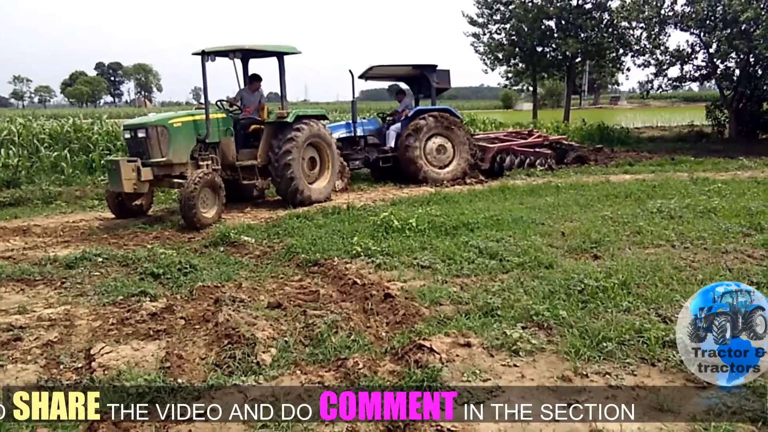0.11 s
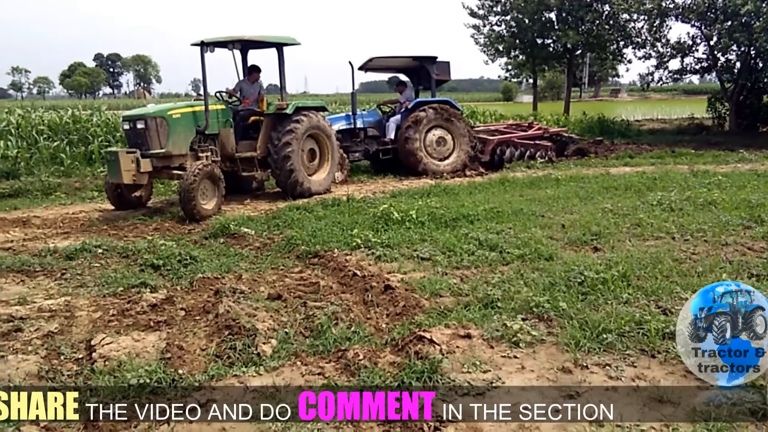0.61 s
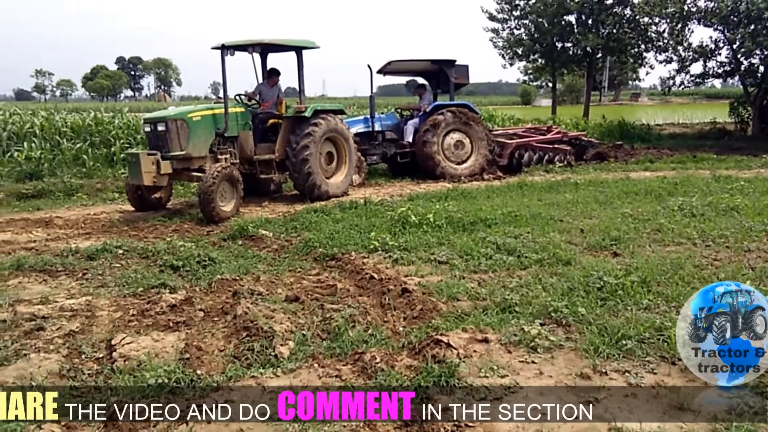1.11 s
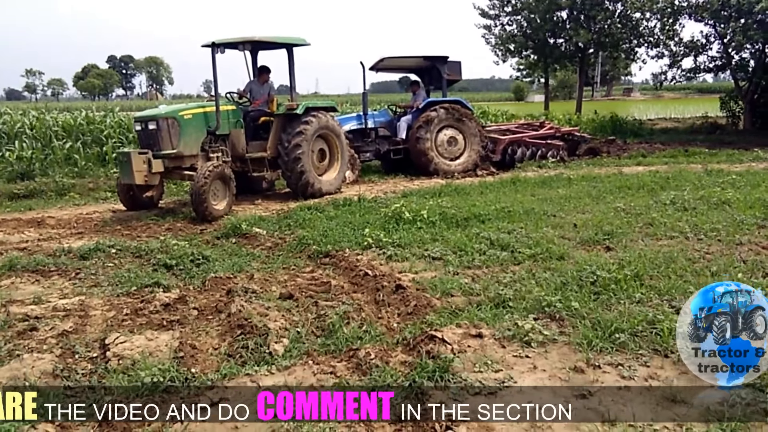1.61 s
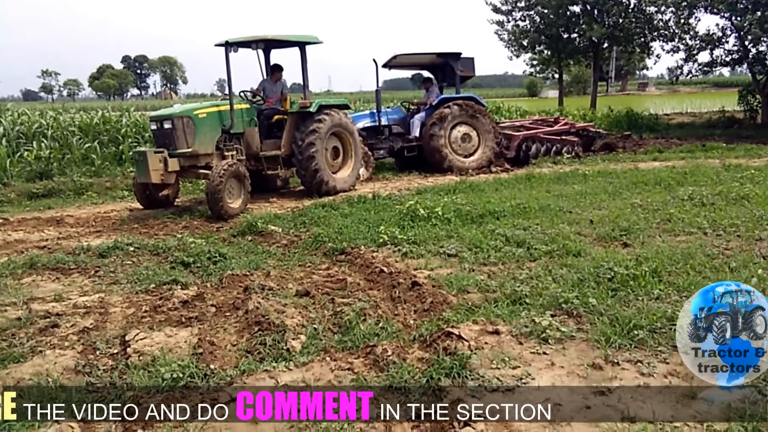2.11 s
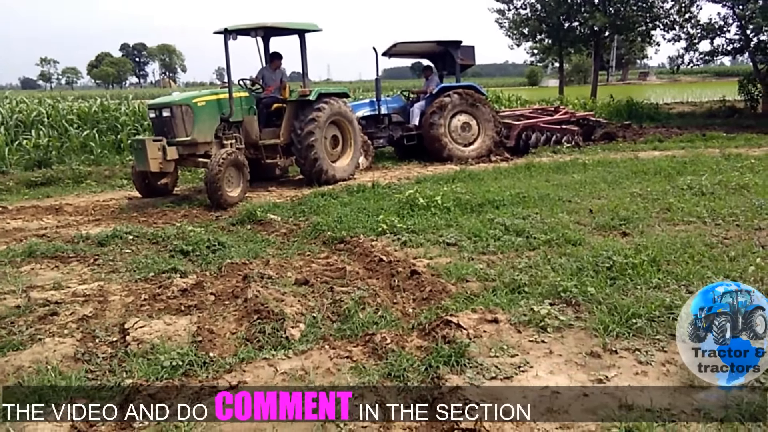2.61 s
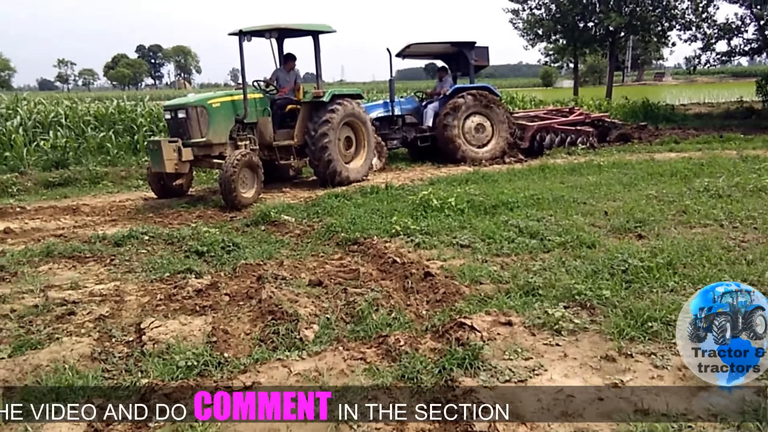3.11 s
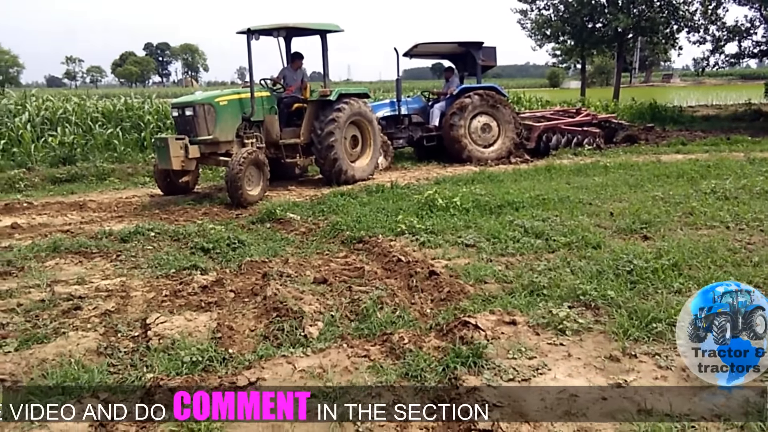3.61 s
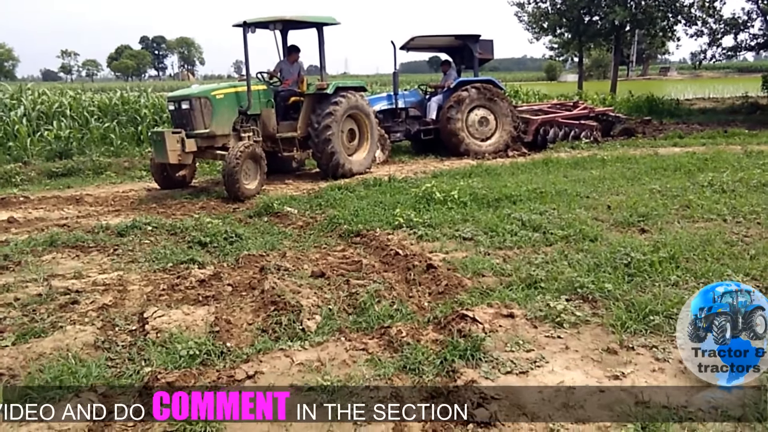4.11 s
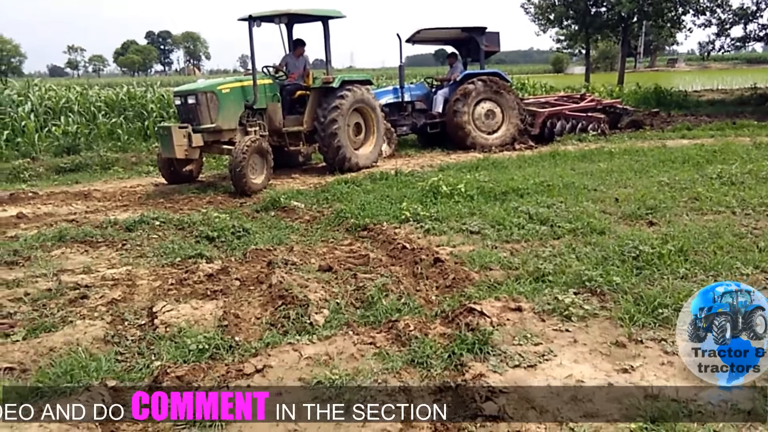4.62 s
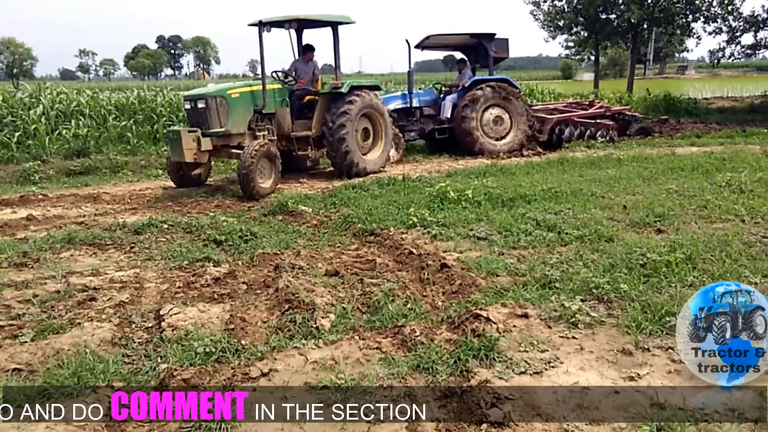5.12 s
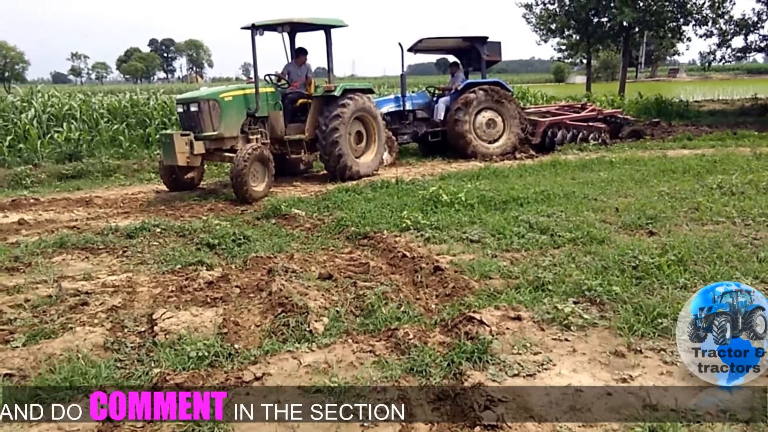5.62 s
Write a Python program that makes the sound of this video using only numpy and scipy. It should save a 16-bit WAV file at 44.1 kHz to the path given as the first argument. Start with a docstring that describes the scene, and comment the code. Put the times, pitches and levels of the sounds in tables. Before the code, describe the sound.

Two diesel tractors knock and clatter at a slow steady pace across an open field while wind buffets and slaps the microphone.

```python
"""Two three-cylinder diesel tractors run at a slow, steady pace across a field, some way off.
From the start the nearer one knocks and clatters much alike in every cycle, by resonances struck in turn;
the farther one ticks slightly faster. An early rattle dies away; steel parts ping as decaying sines.
Wind, shaped noise with slaps, buffets the microphone throughout; late on the near engine works harder.
The engines come once direct and once off the soft ground."""
import sys
import numpy as np
from scipy import signal
from scipy.fft import rfft, irfft, next_fast_len
from scipy.io import wavfile
from scipy.ndimage import uniform_filter1d, map_coordinates

SR = 44100
rng = np.random.default_rng(int(sys.argv[2]) if len(sys.argv) > 2 else 0)


def gain_from_db(level_db):
    """Turn a decibel level (scalar or array-like) into a linear amplitude factor."""
    decades = np.asarray(level_db, float) / 20
    return 10 ** decades


def dump_mix(stems):
    """Bounce the given channels to the path in sys.argv[1] as a 16-bit WAV at rate SR."""
    frames = np.atleast_2d(stems).T  # one column per channel
    limited = np.clip(frames, -1, 1)  # hard clip at full scale
    pcm = np.round(limited * 32767).astype(np.int16)
    wavfile.write(sys.argv[1], SR, pcm)


N = 252693
T = np.arange(N) / SR

# Engine paces; one cycle = two crank turns, three firings: start_s, pace_cycles_per_s
NEAR_PACE = [(0, 11.272), (.5, 11.297), (1.5, 11.243), (2, 11.262), (3, 11.239), (4.5, 11.262), (6, 11.265)]
FAR_PACE = [(0, 11.35), (3, 11.51), (4.5, 11.72), (5.8, 11.76)]
# How hard the near engine works: start_s, level_db
EFFORT = [(0, 0.5), (1.2, 0.5), (3.4, 0.5), (4.3, 1), (4.82, 2.5), (5.3, 1.5), (5.73, 1)]
DIP_S, DIP_LONG_S, DIP_DB = 1.527, 0.057, -4.5  # the engine's level dips briefly

# Blows in one near-engine cycle, relative: place_cycles, casing_db, block_db, pump_db
BLOWS = [(.012, -42, -29, -52), (.09, -36, -36, -43), (.16, -37, -40, -46.5), (.25, -43, -33.5, -52.5),
         (.29, -38, -32, -50), (.333, -42, -33, -34), (.4, -37, -38, -46), (.5, -40, -35, -50),
         (.6, -35, -41, -40), (.635, -44, -30, -50.5), (.682, -41, -37, -46), (.75, -40, -36, -49),
         (.806, -44, -36, -39), (.843, -40, -38, -50), (.885, -44, -34, -51.5), (.935, -36.5, -28, -46)]
BLOWS_DB = -6  # applied to all blows
# Valve ticks in one cycle: place_cycles, level_db
TICKS = [(.0, -54), (.03, -55), (.24, -60), (.28, -60), (.61, -62), (.675, -61)]
# Resonances of the parts: pitch_hz, width_hz, level_db
CASING = [(607, 260, -4.5), (740, 160, -6.5), (900, 160, -8), (1050, 80, -4)]
BLOCK = [(1310, 60, -12), (1425, 55, -4.5), (1500, 58, -1), (1630, 110, -11)]
PUMP = [(2036, 64, 3), (2355, 42, -4), (2650, 83, -1)]
PANELS = [(3926, 14, 7), (4450, 21, 7.6), (5220, 380, 28), (7770, 620, 4), (9600, 82, 15.5)]
VALVES = [(5240, 280, 7.9), (6370, 130, 1.3), (7480, 330, 3.5), (13500, 2500, 11)]
# Blows between these places (cycles) ring the block lower, by this ratio
THIRD_FROM, THIRD_TO, THIRD_LOWER = .62, .7, .955
# Whines that sink or climb in every cycle: place_cycles, length_cycles, from_hz, to_hz, level_db
GLIDES = [(.06, .17, 1080, 680, -43.5), (.2, .3, 720, 840, -46), (.56, .44, 960, 820, -45.5),
          (.5865, .41, 670, 770, -47), (.92, .14, 850, 590, -45.5), (.86, .16, 900, 1050, -48)]
# Wavering exhaust and gear tones: multiple_of_cycle_rate, level_db
TONES = [(12, -54), (30, -53.5), (54, -56), (101, -57)]
# Spectrum of loose clatter: pitch_hz, density_db (per Hz)
CLATTER = [(150, -18), (300, -14), (550, -2.5), (900, -1), (1500, -3), (2100, -2.5), (3000, -17.5),
           (5000, -28), (8000, -35.5), (11000, -41), (12600, -52), (14300, -49), (15600, -58)]
RATTLE_DB, FIZZ_DB = -41.5, -49
EARLY_DB, EARLY_FADE_S = -50, 1.7  # a rattle near 3 kHz that dies away as the tractors move on

# Loose steel parts: start_s, level_db, pitch_hz
PINGS = [(0.243, -36, 4450), (0.69, -34, 4460), (2.0385, -30.5, 4450), (2.926, -40, 5370),
         (3.8094, -44, 5220)]

# Wind between gusts: start_s, level_db
BREEZE = [(0, -31), (.45, -29), (1, -28.5), (1.3, -26.5), (2.05, -29), (2.9, -28), (3.8, -25), (4.47, -30),
          (4.8, -27.5), (5.73, -27.5)]
# Gusts, nominal level: start_s, length_s, level_db, flutter_over_buffet_db
GUSTS = [(0.502, 0.078, -24.5, -7), (0.6, 0.072, -22, -29), (0.71, 0.21, -21, -12.5),
         (1.113, 0.012, -11.5, -30), (1.366, 0.04, -20, -14), (1.462, 0.2, -21.5, -7.5),
         (1.667, 0.029, -21, -14), (1.779, 0.025, -23, -4), (1.84, 0.11, -25.5, -3.5),
         (2.102, 0.039, -22, -4.5), (2.44, 0.042, -20.5, -13), (2.516, 0.15, -20, -8.5),
         (2.703, 0.15, -23, -6), (3.075, 0.41, -20.5, -7), (3.546, 0.052, -22, -12),
         (3.77, 0.099, -18.5, -19), (4.234, 0.02, -20.5, -7), (4.304, 0.051, -22, -8),
         (4.722, 0.068, -27, -20), (4.83, 0.11, -26.5, -7.5), (4.937, 0.063, -28, -5),
         (5.078, 0.058, -23.5, -11), (5.2, 0.028, -19, -5.5), (5.353, 0.17, -18, -10.5),
         (5.563, 0.12, -26, -5.5)]
GUST_EDGE_S, BREEZE_FLUTTER_DB = 0.01, -7.5
# Spectra of slow and fast eddies: pitch_hz, density_db (per Hz)
BUFFET = [(5.9, -64), (10, 3), (35, 5), (71, -1), (130, -16), (170, -14), (290, -120)]
FLUTTER = [(50, -23.5), (90, -2.5), (140, -6.5), (220, -12), (330, -19), (500, -31.5), (800, -26)]
LOPSIDED = 0.65  # eddies push the diaphragm harder than they pull
# Wind slaps: start_s, level_db, flap_hz
POPS = [(0.494, -25, 235), (0.789, -22.5, 282), (1.478, -15, 211), (1.595, -21.5, 210), (2.826, -20.5, 273),
        (3.09, -33, 295), (3.142, -27, 254), (3.189, -21, 213), (3.249, -20, 196), (3.292, -26.5, 322),
        (3.491, -23, 415), (3.54, -27, 249), (5.382, -35, 416)]
PUSH_DB, PUSH_S, FLAP_S = 3, 0.0028, .0029  # each slap shoves the diaphragm once and lets it flap
# One eddy whose beat slows down: start_s, length_s, from_hz, to_hz, level_db
SWOOP = (.505, .13, 140, 45, -23)

# Faint flicker of the top treble, no sound of the field, nominal level: start_s, length_s, level_db
TREBLE_FLICKER = [(0, .17, -67), (1.58, .3, -70), (5.46, .3, -72)]
FLICKER_FADE_S = .2


def near_tractor():
    """Cyclic excitation: effort scales blows, whines and clatter; valve ticks and tones stay apart."""
    cycles = np.cumsum(curves(NEAR_PACE)[0]) / SR
    dip_db = DIP_DB * np.exp(-((T - DIP_S) / DIP_LONG_S) ** 2)
    effort = gain_from_db(curves(EFFORT)[0] + dip_db)
    driven = gain_from_db(BLOWS_DB) * blows(cycles) + glides(cycles) + clatter(cycles)
    return effort * driven + valve_ticks(cycles) + tones(cycles)


def blows(cycles):
    """Impact and resonance: repeating blows ring the casing, block and pump at their own modes."""
    place, casing_db, block_db, pump_db = np.transpose(BLOWS)
    out = rung(train(cycles, place, casing_db, 0.71, 3e-5, soft_hz=2640), CASING)
    third = (place > THIRD_FROM) & (place < THIRD_TO)
    for part, ratio in ((~third, 1), (third, THIRD_LOWER)):
        clicks = train(cycles, place[part], block_db[part], 1.3, 2e-5, soft_hz=2600)
        modes = [(hz * ratio, width_hz, db) for hz, width_hz, db in BLOCK]
        out += rung(swelling(clicks, 1480, 480), modes)
    clicks = train(cycles, place, pump_db, 2, 4e-5, soft_hz=2600)
    return out + rung(swelling(clicks, 2150, 700), PUMP)


def swelling(clicks, hz, wide_hz):
    """Band-limited transmission: through thick metal clicks build up over a few swings, not a crack."""
    return filtered(clicks, lambda f: 1j * f * wide_hz / (hz * hz - f * f + 1j * f * wide_hz))


def glides(cycles):
    """Frequency modulation: short tones slide alike in each cycle, drifting in strength and phase."""
    out = 0
    for place, long, from_hz, to_hz, db in GLIDES:
        u = (cycles - place) % 1 / long  # 0-1 along the glide
        s = u * long / NEAR_PACE[0][1]
        shape = np.where(u < 1, np.sqrt(np.abs(np.sin(np.pi * u))), 0)
        turns = s * (from_hz + (to_hz - from_hz) * u / 2)
        level = gain_from_db(db + 1.6 * wobble(4)) * np.sqrt(2)
        out = out + level * shape * np.sin(2 * np.pi * turns + .4 * wobble(2.5))
    return out


def clatter(cycles):
    """Amplitude modulation: loose-part noise swells at each firing, most at the cylinder that fires harder."""
    firing = np.cos(2 * np.pi * (3 * cycles - .02))
    lead = np.cos(2 * np.pi * (cycles - .93))
    body = hiss(CLATTER) * gain_from_db(.5 * firing + 0.7 * lead + 1.2 * wobble(70))
    bright = hiss(CLATTER) * gain_from_db(1.2 * firing + .6 * lead + .8 * wobble(90))
    bright = patchy(bright, wide_hz=389, long_s=1.44, depth_db=2.0)
    bright = patchy(bright, wide_hz=920, long_s=.03, depth_db=1.5)
    # body and bright cross over at 2500 Hz
    low = filtered(body, lambda hz: 1 / (1 + (hz / 2500) ** 6))
    high = filtered(bright, lambda hz: 1 - 1 / (1 + (hz / 2500) ** 6))
    rattle = gain_from_db(RATTLE_DB) * (unit(low) + 0.35 * unit(rung(body, BLOCK)))
    panels = unit(rung(hiss(CLATTER[5:]), PANELS))
    fizz = gain_from_db(FIZZ_DB) * unit(unit(high) + 0.25 * panels)
    early_level = gain_from_db(EARLY_DB) * np.exp(-(T / EARLY_FADE_S) ** 2)
    early = early_level * unit(rung(bright, [(2970, 750, 0)]))
    return rattle + fizz + early


def valve_ticks(cycles):
    """Impact and resonance: light, loosely timed clicks ring the valve gear."""
    return rung(train(cycles, *np.transpose(TICKS), 3.6, 0.0003, soft_hz=5930), VALVES)


def tones(cycles):
    """Harmonic series: exhaust and gear tones at multiples of the cycle rate waver in level and phase."""
    out = 0
    for multiple, db in TONES:
        level = gain_from_db(db + 2.5 * wobble(4)) * np.sqrt(2)
        phase = 2 * np.pi * (multiple * cycles + rng.random()) + .7 * wobble(5)
        out = out + level * np.sin(phase)
    return out


def far_tractor():
    """Impact and resonance: one clear pump tick a cycle, and uneven knocks at the firings."""
    cycles = np.cumsum(curves(FAR_PACE)[0]) / SR
    tick = rung(train(cycles, np.array([.07]), -38.5, 2.5, 3e-4), PUMP[:1])
    knocks = train(cycles, np.array([.25, .58, .92]), -42, 1.2, 1e-4)
    return tick + rung(knocks, BLOCK) + gain_from_db(2) * rung(knocks, CASING)


def pings():
    """Free decay: loose steel parts touch and ring for a moment."""
    out, t = np.zeros(N + SR), T[:SR // 10]
    for start_s, db, hz in PINGS:
        decay = gain_from_db(db - 60 * t / 0.032)  # 60 dB in 32 ms
        rise = np.tanh((t / 0.003) ** 2)
        out[round(start_s * SR):][:len(t)] += decay * rise * np.sin(2 * np.pi * hz * t)
    return out[:N]


def ground(x):
    """Interference: the bounce off soft soil is 1.5 ms late, phase-turned and duller; it combs the spectrum."""
    def response(hz):
        duller = 0.43 * np.exp(-(hz / 3300) ** 2)
        return 1 + duller * np.exp(-2j * np.pi * (hz * 0.001514 - .246))
    return filtered(x, response)


def wind():
    """Turbulent pressure: eddies burst on the microphone as slow buffets, faster flutter and a few slaps."""
    breeze = gain_from_db(curves(BREEZE)[0]) ** 2
    buffet_power, flutter_power = breeze, breeze * gain_from_db(BREEZE_FLUTTER_DB) ** 2
    for start_s, long_s, db, flutter_db in GUSTS:
        shape = span(start_s, long_s, GUST_EDGE_S, GUST_EDGE_S)
        buffet_power = buffet_power + gain_from_db(db) ** 2 * shape
        flutter_power = flutter_power + gain_from_db(db + flutter_db) ** 2 * shape
    lumps = wobble(21.96)  # shared by buffet and flutter
    out = np.sqrt(buffet_power) * unit(gain_from_db(0.23 * lumps) * hiss(BUFFET))
    out += np.sqrt(flutter_power) * unit(gain_from_db(0.49 * lumps + 2.04 * wobble(60)) * hiss(FLUTTER))
    out += LOPSIDED * filtered(out ** 2, lambda hz: 1j * hz / (12 + 1j * hz))
    return out + slaps() + swoop()


def slaps():
    """Impulse response: each slap shoves the diaphragm one way and lets it flap briefly."""
    out = np.zeros(N)
    for start_s, db, hz in POPS:
        t = T - start_s
        out += gain_from_db(db) * np.exp(-((t - .006) / FLAP_S) ** 2) * np.sin(2 * np.pi * hz * t)
        out += gain_from_db(db + PUSH_DB) * np.exp(-((t - .004) / PUSH_S) ** 2)
    return out


def swoop():
    """Frequency modulation: the beat of one eddy slows down as it passes."""
    start_s, long_s, from_hz, to_hz, db = SWOOP
    u = np.clip((T - start_s) / long_s, 0, 1)
    turns = long_s * u * (from_hz + (to_hz - from_hz) * u / 2)
    return gain_from_db(db) * np.sqrt(np.abs(np.sin(np.pi * u))) * np.sin(2 * np.pi * turns)


def treble_flicker():
    """Band-limited noise: the top treble flickers faintly, setting in at once and fading slowly."""
    level = sum(gain_from_db(db) * span(s, long_s, .004, FLICKER_FADE_S) for s, long_s, db in TREBLE_FLICKER)
    return level * hiss([(10000, -16), (11000, -4), (12000, 2), (12700, -20)])


def train(cycles, places, dbs, scatter_db, jitter_s, soft_hz=3500):
    """Periodic excitation: clicks at set places of every cycle, each a little early or late, strong or weak."""
    at = np.arange(-1, int(cycles[-1]) + 1)[:, None] + places
    luck = rng.standard_normal((3, *at.shape))
    # part of the timing wanders over several cycles
    luck[0] += 2 * uniform_filter1d(luck[2], size=6, axis=0)
    time_s = np.interp(at, cycles, T, -1, -1) + jitter_s * luck[0]
    i = np.round(time_s * SR).astype(int)
    ok = (i >= 0) & (i < N)
    clicks = np.bincount(i[ok], gain_from_db(dbs + scatter_db * luck[1])[ok], N)
    # the contact takes time: no sharp edge
    return filtered(clicks, lambda hz: 1 / (1 + 1j * hz / soft_hz) ** 3)


def rung(x, modes):
    """Modal superposition: x through resonances; a unit click rings to about their level."""
    def response(f):
        return sum(gain_from_db(db) * SR / np.pi * 1j * f / (hz * hz - f * f + 1j * f * width_hz)
                   for hz, width_hz, db in modes)
    return filtered(x, response)


def hiss(points):
    """Spectral shaping: noise of rms 1 with a (pitch_hz, density_db) spectrum."""
    f, db = np.transpose(points)

    def response(hz):
        return gain_from_db(np.interp(np.log(hz + 1), np.log(f), db, -120, -120))
    return unit(filtered(rng.standard_normal(N), response))


def patchy(x, wide_hz, long_s, depth_db):
    """Time-frequency modulation: x with random louder and softer patches."""
    z = signal.stft(x, nperseg=256)[2]
    bands = np.arange(z.shape[0]) * SR / 256 / wide_hz
    times = np.arange(z.shape[1]) * 128 / SR / long_s
    grid = np.meshgrid(bands, times, indexing="ij")
    field = map_coordinates(rng.standard_normal((200, 600)), grid, mode="wrap")
    return signal.istft(z * gain_from_db(depth_db * field), nperseg=256)[1][:N]


def filtered(x, response):
    """Linear filtering: the spectrum of x times a complex response of frequency."""
    m = next_fast_len(N + SR // 2)
    return irfft(rfft(x, m) * response(np.fft.rfftfreq(m, 1 / SR)), m)[..., :N]


def span(start_s, length_s, rise_s, fall_s):
    """Envelope: rises at the start, holds at up to 0.64 and falls after the length."""
    rise = 1 + np.tanh((T - start_s) / rise_s)
    fall = 1 - np.tanh((T - start_s - length_s) / fall_s)
    return 0.16 * rise * fall


def wobble(rate):
    """Slow random fluctuation: a smooth curve with rate knots a second."""
    return map_coordinates(rng.standard_normal(int(N * rate / SR) + 4), [T * rate])


def curves(rows):
    """Linear interpolation: one value per sample for each column after the time."""
    s, *cols = np.transpose(rows)
    return [np.interp(T, s, c) for c in cols]


def unit(x):
    """Normalization: x at rms 1."""
    return x / np.sqrt(np.mean(x ** 2) + 1e-20)


def scene():
    """Superposition: engines over the ground, pings, wind at the microphone; the treble flicker is added last."""
    engines = ground(near_tractor() + far_tractor())
    field = engines + pings() + wind()
    return (field + treble_flicker())[None]


def roll_off(x):
    """The treble ends steeply here."""
    return signal.sosfilt(signal.butter(12, 15530, fs=SR, output="sos"), x)


def record(dry):
    """Gain control: everything is ducked under the strongest buffets."""
    level = uniform_filter1d(np.abs(dry), size=900)
    gain = uniform_filter1d(1 / (1 + (level / 0.23) ** 3.6), size=1200)
    return roll_off(dry * gain)


dry = scene()
out = record(dry)
dump_mix(out)
```